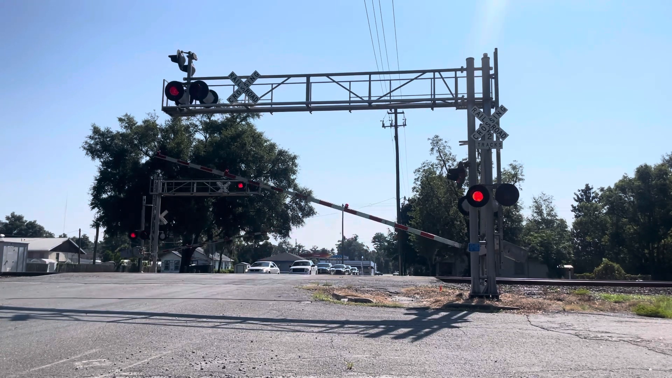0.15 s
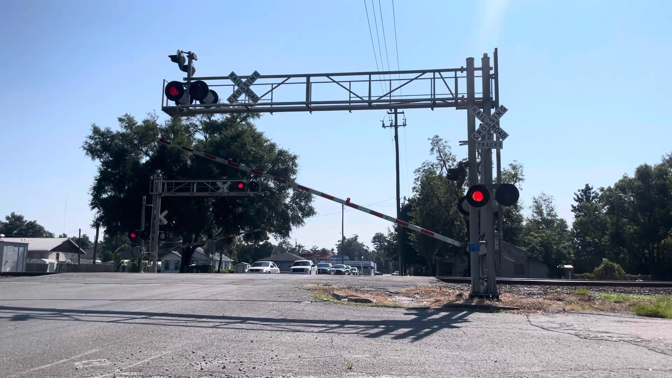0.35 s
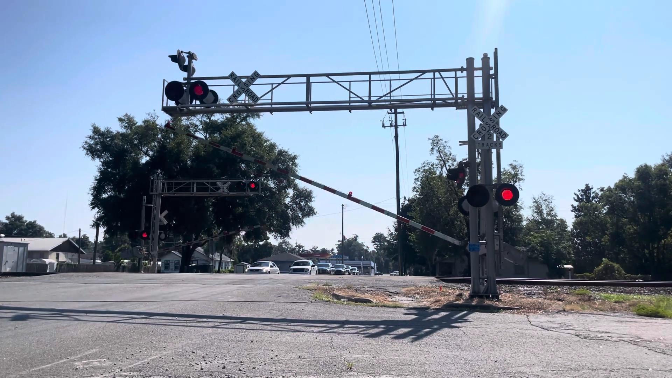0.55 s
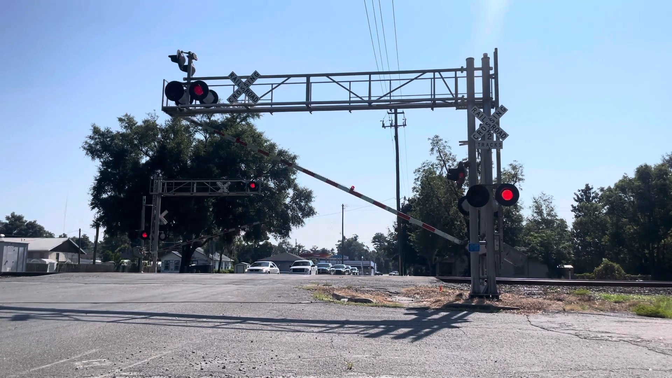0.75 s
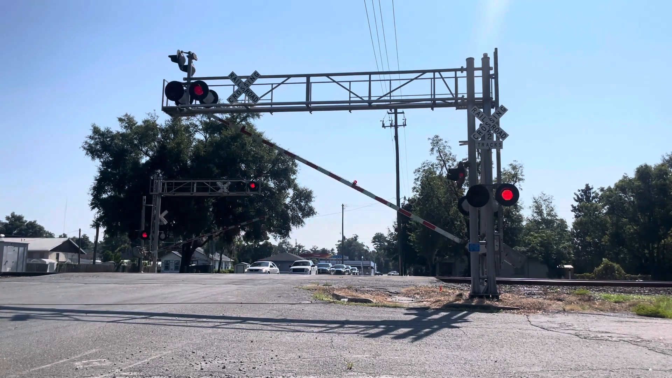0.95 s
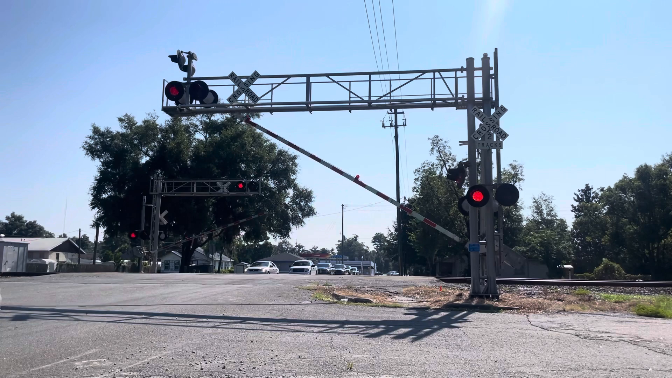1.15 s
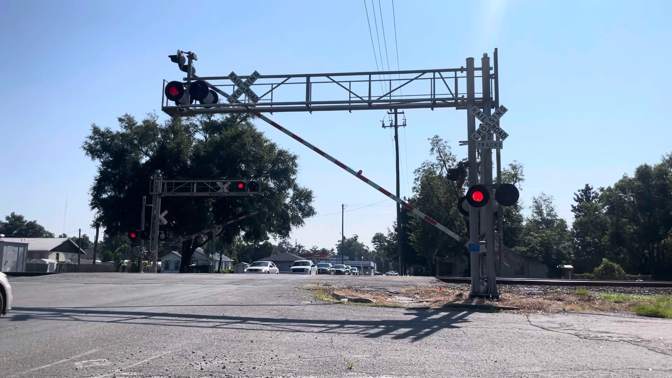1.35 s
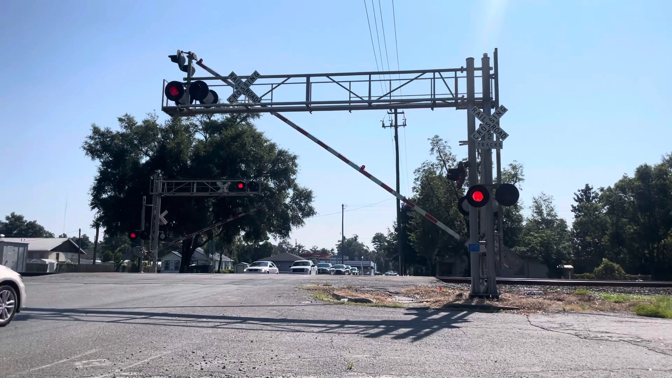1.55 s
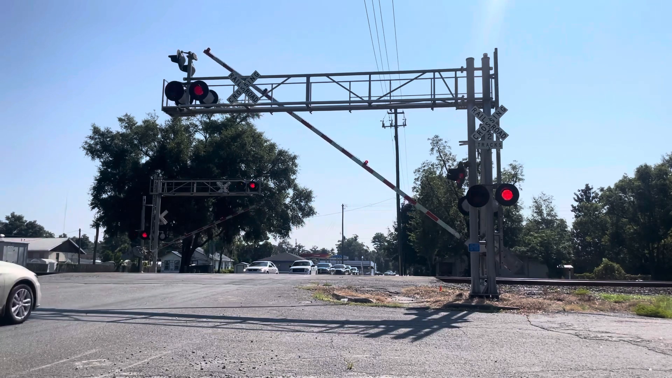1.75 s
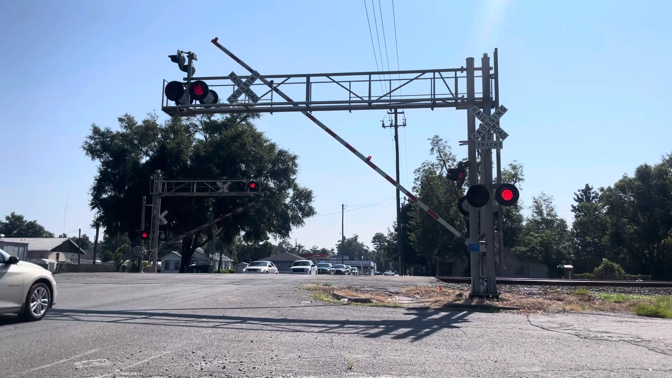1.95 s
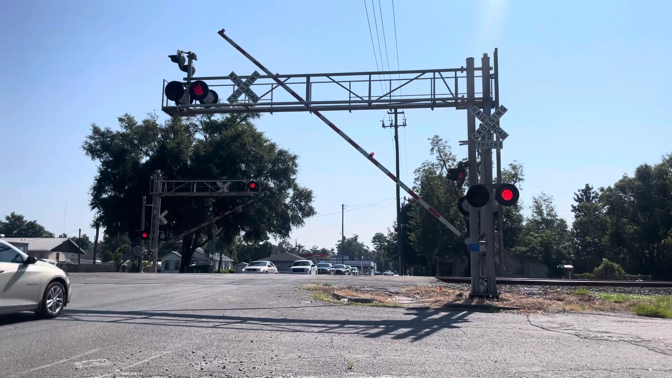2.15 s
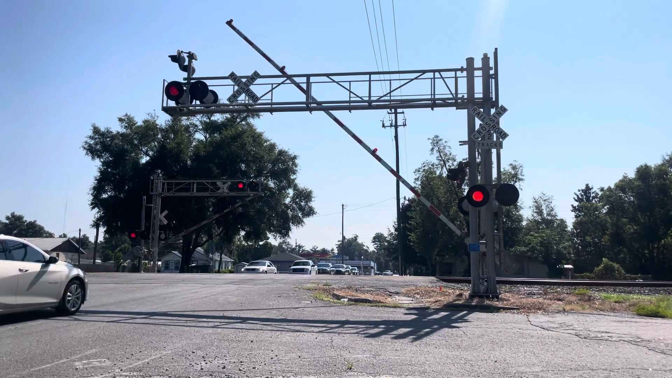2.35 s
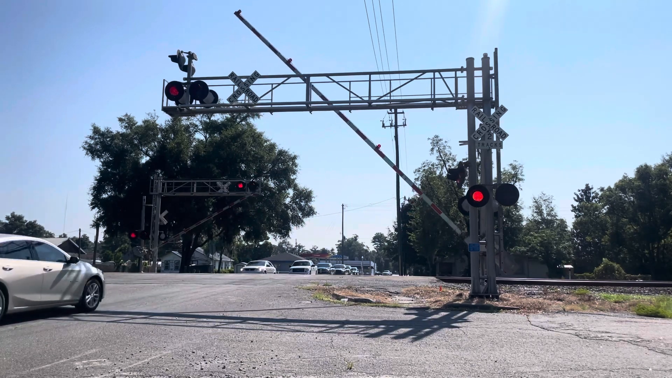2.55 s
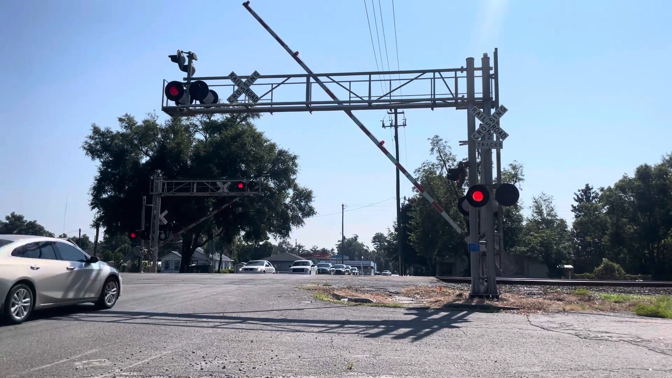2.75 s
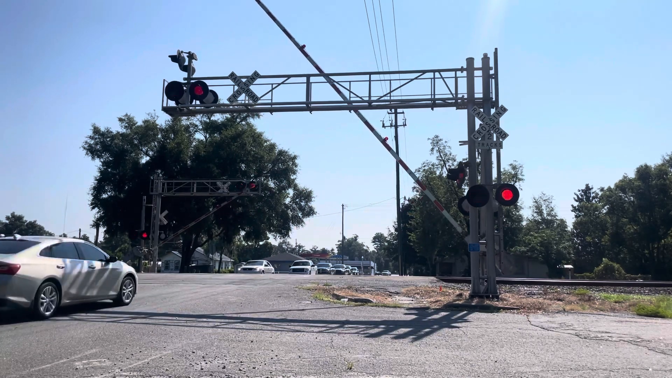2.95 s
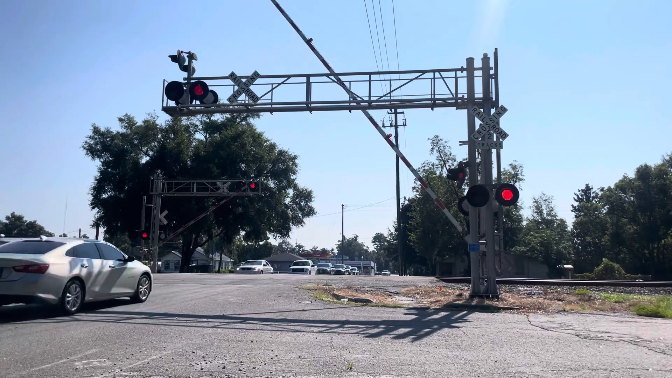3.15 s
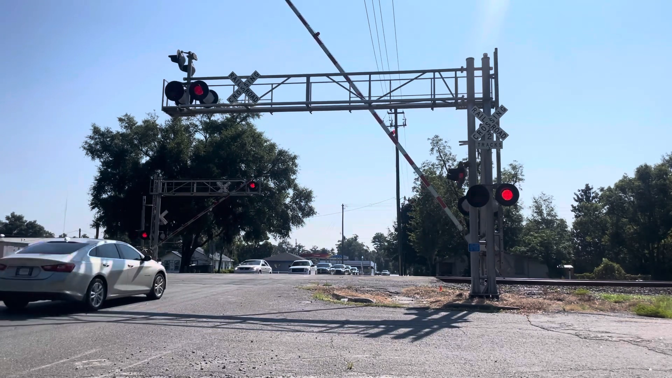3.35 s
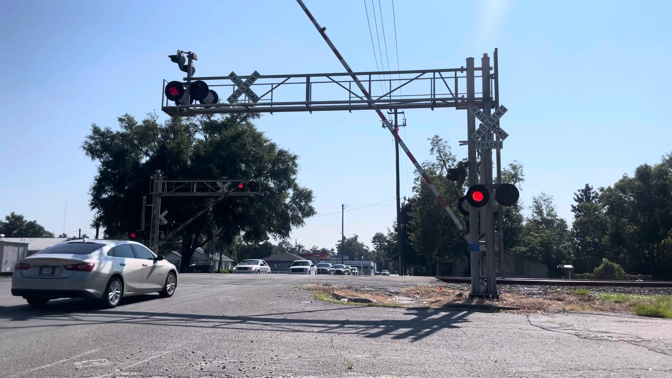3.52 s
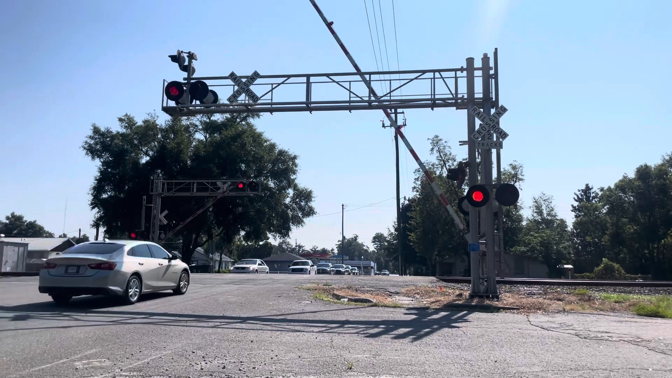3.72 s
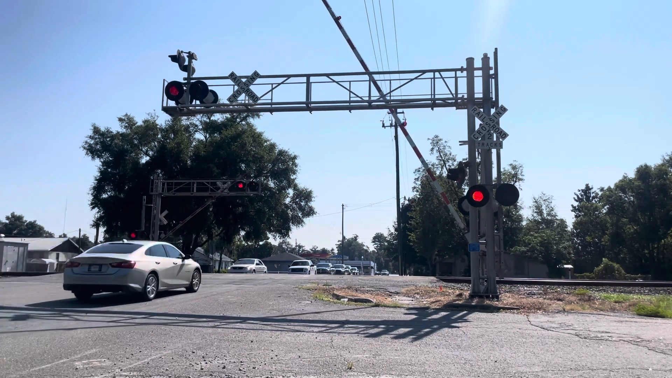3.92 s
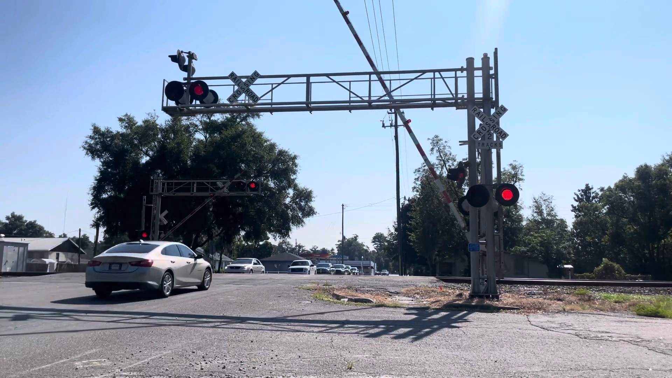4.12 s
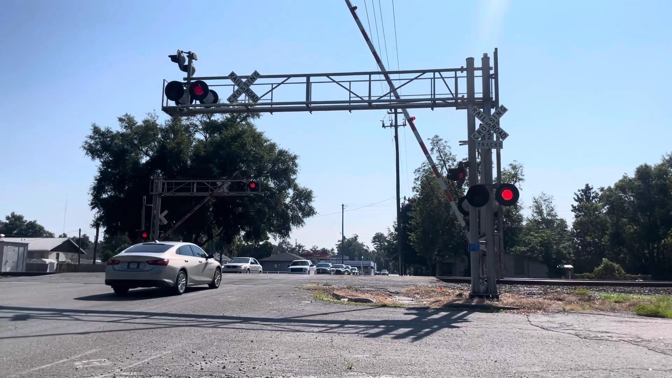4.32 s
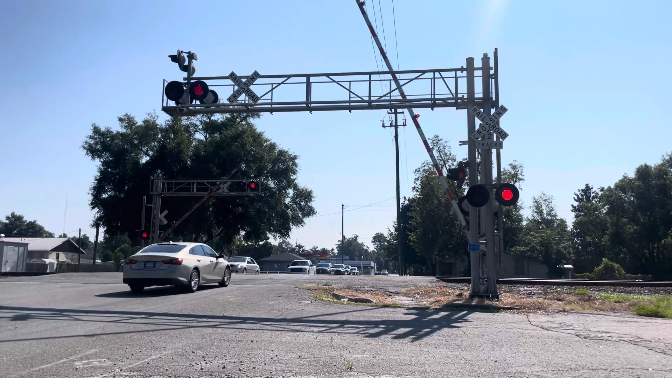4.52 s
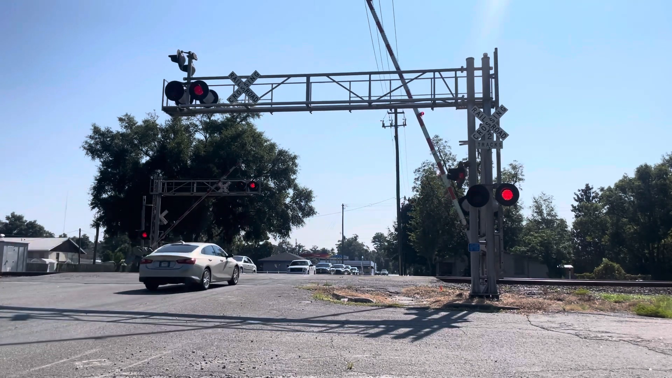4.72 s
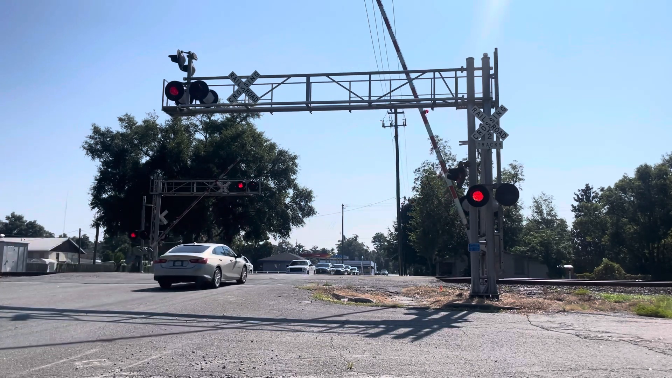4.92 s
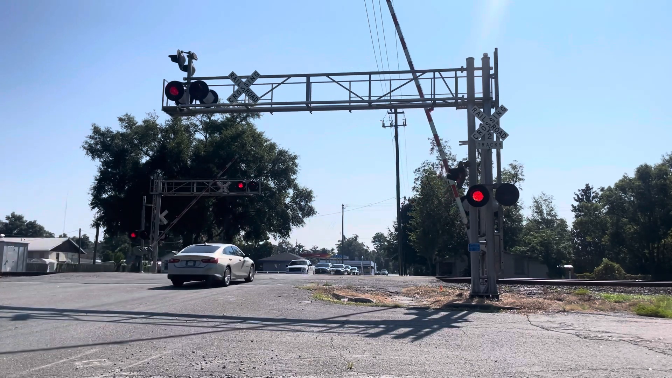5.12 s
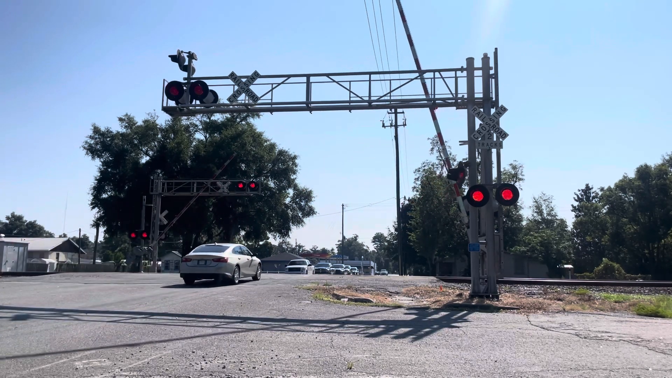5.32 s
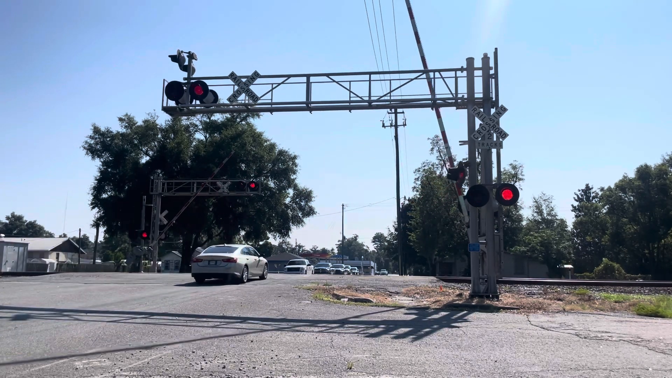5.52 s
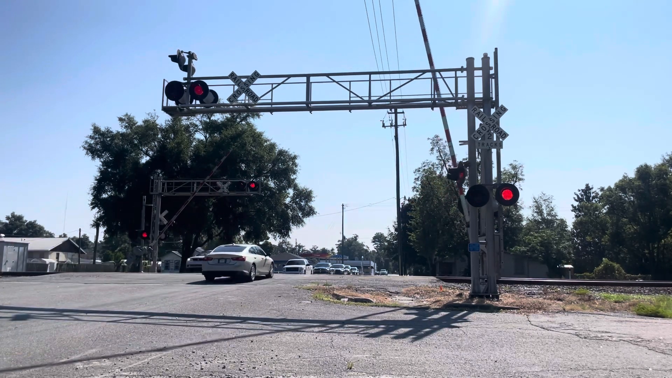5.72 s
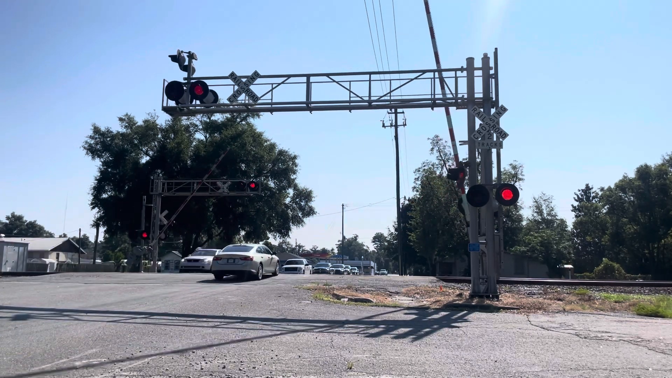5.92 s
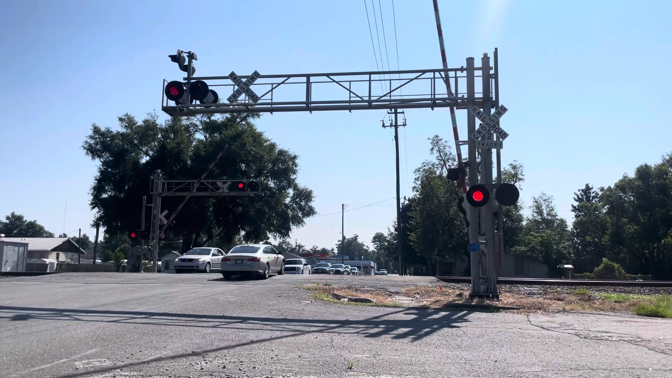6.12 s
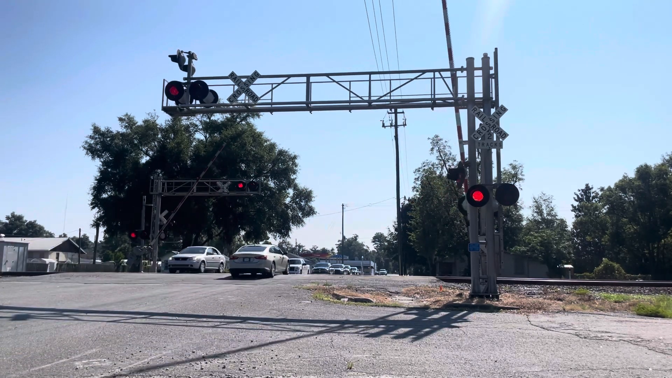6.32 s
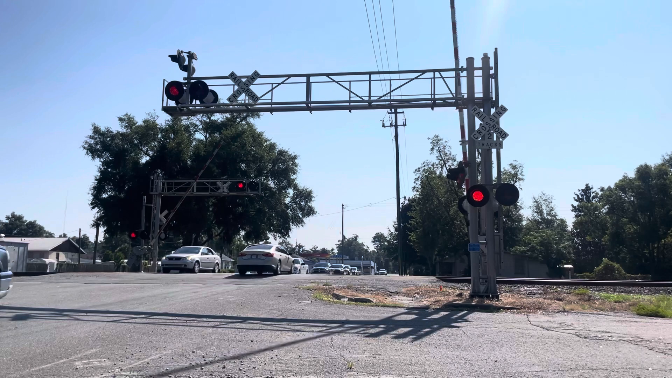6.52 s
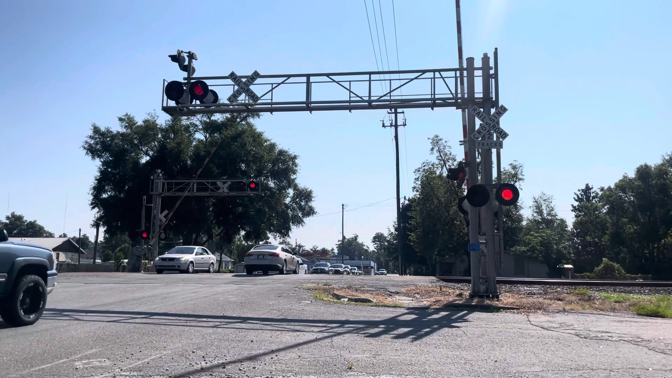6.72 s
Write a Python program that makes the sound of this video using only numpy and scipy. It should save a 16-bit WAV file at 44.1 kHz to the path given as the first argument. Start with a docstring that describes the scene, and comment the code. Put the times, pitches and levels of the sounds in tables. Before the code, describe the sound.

Outdoor road by a rail crossing: soft engine throb, sudden booming acceleration growing nearer, tyre hiss, faint insects and birds, then a quick rattling knock over metal plates.

```python
"""A V8 pickup idles at a level crossing, then pulls away with a booming exhaust, coming up from the left.
Its puffs and engine notes follow one engine-speed curve; its belt squeaks as the engine picks up.
A saloon drives off first: a gliding hum and tyre noise, then knocks that ring the crossing's plates.
Shaped noise makes the distant traffic and the insects; gliding tones make a few far birds.
Road sound reaches the left and right microphones at different times."""
import sys
import numpy as np
from scipy import signal
from scipy.fft import rfft, irfft, next_fast_len
from scipy.io import wavfile
from scipy.ndimage import map_coordinates

SR = 44100
rng = np.random.default_rng(int(sys.argv[2]) if len(sys.argv) > 2 else 0)


def pcm_store(signal):
    """Save signal as 16-bit PCM."""
    levels = np.round(np.clip(np.atleast_2d(signal), -1, 1) * 32767)
    wavfile.write(sys.argv[1], SR, levels.astype(np.int16).T)


N = 302967
T = np.arange(N) / SR  # time in seconds

# Tone-colour tables give relative levels.
# engine speed, idling with a light touch of the pedal, then pulling away: (t/s, firing rate f/Hz)
IDLING_SPEED = [(0, 35.2), (.6, 35.5), (.83, 40), (1.03, 42.5), (1.22, 41.3), (1.35, 39.1), (1.63, 40.4),
                (1.85, 38.6), (2.37, 33), (2.52, 35.5), (2.62, 42)]
PULLING_SPEED = [(2.76, 49.3), (2.87, 62.3), (3.0, 76.2), (3.13, 82.9), (3.3, 83.4), (3.76, 77.2),
                 (4.03, 80.9), (4.35, 80.2), (5.08, 85.9), (5.3, 88.6), (5.58, 88.7), (5.83, 91.7),
                 (6.45, 94.9), (6.87, 92.7)]
# the eight firings of an engine cycle: (delay/firing intervals, relative strength)
CYLINDERS = [(0.016, 0.27), (0.163, 0.79), (0, 1.1), (0.015, 0.87), (0.15, 0.7), (0.012, 0.92),
             (0.13, 0.66), (0.14, 0.44)]
# lines from the two banks' uneven firing: (harmonic of engine cycle, level/dB ahead, level/dB at the side)
LOPE_LINES = [(5, -30.5, -30.5), (7, -35, -30.5), (9, -33.5, -46), (10, -31, -40.5), (11, -32, -43),
              (12, -38.5, -34), (13, -47, -39), (14, -41.5, -35), (15, -41.5, -34.5), (17, -43.5, -44.5),
              (18, -25.5, -28), (19, -48, -35), (20, -33.5, -45), (21, -32, -39.5), (22, -40, -46),
              (24, -33.5, -42.5), (26, -44.5, -49), (29, -42.5, -49), (32, -48.5, -51)]
# upper lines of the idling engine: (harmonic of engine cycle, relative level/dB)
IDLE_LINES = [(24, 1), (32, -0.5), (37, -12.5), (40, -9), (48, -22), (56, -22)]
# colour the exhaust pipe gives the idle throb: (f/Hz, level/dB)
IDLE_PIPE = [(55, -13.5), (70, -1), (83, 3.5), (105, -3.5), (124, 1), (145, 2.5), (175, -0.5), (210, -1.5),
             (250, -8), (330, -9)]
# colour the exhaust pipe gives the puffs: (f/Hz, level/dB)
PUFF_PIPE = [(15, -45), (30, -26), (55, -7), (85, -5.5), (125, -11.5), (165, -15.5), (210, -4), (250, -11),
             (290, -21.5), (340, -24.5), (500, -34), (900, -50), (2000, -77.5)]
# colour of the silencer shell: (f/Hz, level/dB)
GROWL_COLOUR = [(150, -50.5), (270, -10.5), (320, -0.5), (400, 2.5), (470, 3.5), (540, -4), (620, -14),
                (800, -13), (1100, -34), (2000, -57)]
# strength of the silencer's growl: (t/s, level/dB)
GROWL_LEVEL = [(0, -39.5), (2, -54.5), (2.7, -51.5), (3.05, -42), (3.8, -47.5), (4.6, -41), (5.2, -37),
               (5.7, -39), (6.2, -37.5), (6.87, -36.5)]
# passing upper engine lines: (loudest t/s, half-length/s, harmonic of engine cycle, level/dB before the lift)
OVERTONES = [(4.27, .25, 41, -43), (4.95, .15, 43, -43), (5.1, .17, 34, -37), (5.3, .3, 42, -42),
             (5.6, .25, 46, -48), (5.65, .35, 25, -34), (5.85, .5, 26, -36), (6, .25, 35, -43),
             (6.05, .25, 28, -41), (6.25, .25, 32, -42), (6.25, .45, 43, -47), (6.55, .4, 39, -47),
             (6.6, .3, 21, -30), (6.7, .25, 36, -42), (6.85, .25, 24, -36)]
# lift given to the higher upper lines, to offset left-right cancellation: (f/Hz, gain/dB)
OVERTONE_LIFT = [(250, 0), (480, 8)]
# colour of the gas rasp: (f/Hz, level/dB)
RASP_COLOUR = [(200, -14), (350, -0.5), (500, 2), (700, -2.5), (900, -4), (1200, -6.5), (1500, -15.5),
               (2500, -38.5)]
# strength of the gas rasp: (t/s, level/dB)
RASP_LEVEL = [(0, -51), (1, -50), (2.9, -45.5), (5.3, -46.5), (6.87, -40)]
# colour of the intake noise: (f/Hz, level/dB)
INTAKE_COLOUR = [(550, -27), (720, 1.5), (820, 11), (930, -14.5), (1150, -11.5), (1400, -5), (1700, -13.5),
                 (2400, -21.5), (4000, -46)]
# the saloon's engine hum: (t/s, f/Hz, level/dB)
SALOON_HUM = [(0, 45.4, -58.5), (.9, 48.5, -38.5), (1.3, 52.9, -35), (1.75, 55.85, -33.5),
              (2.3, 58.5, -32.5), (2.6, 57.3, -33.5), (3.5, 61.7, -56.5), (6.87, 60.2, -77)]
# colour of tyre noise: (f/Hz, level/dB)
TYRE_COLOUR = [(600, -8), (1100, -9.5), (1700, -2.5), (2400, -3), (3200, -4.5), (4100, -8), (6000, -8),
               (9000, -53)]
# colour of the treble hiss: (f/Hz, level/dB)
HISS_COLOUR = [(3400, -13), (4400, -1.5), (5500, -2.5), (6400, 4), (6900, 3), (7600, -7), (8600, -12.5),
               (10300, -4.5), (12000, -11), (15500, -27)]
# strength of the treble hiss: (t/s, level/dB)
HISS_LEVEL = [(0, -56.5), (1.9, -58), (2.5, -58), (4.1, -60), (5.4, -55), (6.87, -56)]
# bands of the far insects: (centre f/Hz, width/Hz, relative level/dB)
CHORUS_BANDS = [(4400, 400, -61), (5100, 250, -62), (6750, 170, -67)]
# strength of the far insects: (t/s, level/dB)
CHORUS_LEVEL = [(0, -67), (1.6, -60), (2, -65.5), (6.87, -72.5)]
# middles of the near insect's bursts: (t/s)
CHIRP_TIMES = [0.685, 1.567, 2.548]
# colour of the near insect's wings: (f/Hz, level/dB)
WING_COLOUR = [(3500, -24.5), (5000, -14.5), (6500, -24), (8500, -21.5), (9400, -2.5), (10000, -3.5),
               (10500, -13), (13000, -32), (14300, -12), (15500, -25)]
# bird calls: (start t/s, length/s, first f/Hz, last f/Hz, level/dB, random pitch flutter/Hz)
BIRD_CALLS = [(.6, 0.12, 2750, 2600, -55, 447), (0.921, 0.09, 2870, 2600, -53, 450),
              (4.088, 0.18, 4100, 2500, -57, 110), (5.11, .07, 3650, 3100, -60, 55),
              (5.208, 0.1, 3600, 3120, -61, 55)]
# alternator whine: (t/s, level/dB)
WHINE_LEVEL = [(0, -83), (2.8, -66), (3.2, -47), (3.7, -62), (4.2, -43.5), (4.7, -49), (5.2, -62.5),
               (6.87, -60)]
# belt squeal: (t/s, f/Hz, level/dB, random pitch flutter/Hz)
BELT_SQUEAL = [(2.44, 6420, -75, 40.4), (2.465, 6050, -52, 50), (2.49, 6100, -50, 50.3),
               (2.505, 6300, -54, 70.3), (2.575, 6270, -52, 90), (2.61, 6420, -51, 230),
               (2.66, 6580, -52, 376), (2.73, 6500, -62, 398)]
# short belt slips: (middle t/s, f/Hz, level/dB)
BELT_SLIPS = [(2.66, 6560, -46.5), (2.704, 6440, -44), (2.765, 5840, -50), (2.82, 6160, -42),
              (2.944, 5930, -46), (3.149, 6160, -50), (3.339, 5730, -48), (3.84, 6050, -51),
              (3.949, 5870, -45), (4.05, 5620, -47), (4.15, 5760, -51), (4.45, 6400, -47)]
# wheels knocking over the crossing: (t/s, level/dB, time to fall 60 dB/s, brightness/dB per octave)
KNOCKS = [(6.383, -37, 0.24, 0.5), (6.41, -48.5, .18, 1), (6.473, -34.5, 0.22, -2.5),
          (6.486, -35.5, 0.44, 1.5), (6.499, -32, 0.22, -5), (6.512, -38, 0.28, 4), (6.535, -33, 0.3, -8.5),
          (6.548, -40, 0.18, -1), (6.569, -37, 0.3, -1.5), (6.622, -41, 0.21, -3.5),
          (6.648, -42.5, 0.18, -1)]
# ringing notes of the plates: (f/Hz, relative level/dB, time to fall 60 dB/s)
PLATE_MODES = [(737, 7, .15), (905, -4.5, .26), (937, -3, .2), (989, -6.5, .3), (1074, -10.5, .26),
               (1254, -9, .28), (1330, -12, .26), (1464, -12, .26), (1572, -15, .3), (1620, -15, .26),
               (1733, -14.5, .3), (2130, -12.5, .18), (2234, -10.5, .2), (2449, -17.5, .25),
               (2665, -13.5, .19), (3138, -15.5, .25), (3747, -18, .21), (5800, -22, .15)]
# colour of the gritty knocks: (f/Hz, level/dB)
CRUNCH_COLOUR = [(400, -21), (700, -5.5), (950, -2), (1400, -7), (2200, -11), (3200, -16.5), (4500, -21),
                 (6600, -18), (8300, -41.5), (10300, -20), (12500, -43.5), (15000, -38.5)]
# how far the left microphone leads for road sound: (f/Hz, phase/radians)
LEFT_LEAD = [(50, 0.06), (90, 0.39), (180, 1.14), (290, 1.26), (480, 2.5), (950, 2.5), (1300, 3.5),
             (2200, 5), (3000, 7.5), (7000, 4.5), (9600, 4), (14400, 4)]
# how alike the two microphones' noise is: (f/Hz, likeness 0-1)
LIKENESS = [(200, 0.88), (500, 0.52), (1200, 0.64), (3000, 0.54), (6500, 0.27), (12000, 0.16)]
# left level minus right level for road sound: (f/Hz, level/dB)
LEFT_TILT = [(60, -0.5), (180, 2), (350, 4), (1000, 2.5), (2500, 0.3), (6000, -4), (9000, 0.5)]

# truck movement: it starts behind and to the left, and gathers speed evenly
ROLL_S, TRUCK_M_PER_S2, BEHIND_M, LANE_M = 2.45, 1.57, 13.83, 5.4
PEDAL_S, PEDAL_RISE_S = 2.45, 0.23  # the throttle opens
# firing rates: at rest, where load begins, and the span over which it becomes full
IDLE_HZ, LOAD_FROM_HZ, LOAD_SPAN_HZ = 34.9, 47.2, 30.6

# exhaust: levels are at the starting distance
BOOM_DB, OCTAVE_DB = -16, -16  # firing note and its octave under full load
BOOM_SHADE_DB, OCTAVE_SHADE_DB = 0.5, 8  # lost alongside, where the truck's body hides the pipe
LUNGE_S, LUNGE_SPAN_S = 2.95, 0.32  # the truck first strains forward
LUNGE_DB, LUNGE_OCTAVE_DB = 2.5, -3.5  # change this makes to firing note and octave
ROUGH_DB = 0.03  # unsteadiness under load
SURGE_DB, SURGE_HZ, SURGE_WIDTH_HZ = -23.5, 101, 25  # the pipe's lowest resonance
IDLE_DB, IDLE_DB_PER_HZ, PEDAL_DB = -33.5, 0.39, 8  # idle throb; rise with speed; rise with the throttle
BURBLE_IDLE_DB, BURBLE_LOAD_DB, BURBLE_FLARE_DB = -34.5, -45.5, 6.5  # puffs; rise with the throttle
SCATTER_IDLE, SCATTER_LOAD = 0.61, 0.13  # unevenness of firing
THROB_LAG = .03  # each harmonic's throb comes this share of an engine cycle after the one below
TURN_FROM, TURN_SPAN = 0.44, .2  # how far alongside (0-1) the lope changes colour, and over how much
BLUR_RAD, BLUR_HZ = .6, 30  # overtone blur: phase swing, and random points per second
OVERTONE_PULSE = 0.63  # depth of overtone pulsing, once per engine cycle
INTAKE_DB, INTAKE_BEAM_DB = -41, 40  # level alongside; how much it weakens towards straight ahead

# tyres: levels of the saloon at its loudest and of far traffic, then the road reflection's treble dip
SALOON_PASS_S, SALOON_PASS_WIDTH_S = 4.16, 2.16
TYRE_DB, FAR_TYRE_DB = -50, -56
DIP_S, DIP_HZ, DIP_RISE_HZ_PER_S2 = 3.57, 4310, 310  # when lowest, its pitch then, and how fast it climbs
DIP_STRENGTH, DIP_SPAN_S = 0.47, 2.36
# stones pinging under the saloon's tyres: middle pitch, fade time, level of the largest at the peak
GRIT_PER_S, GRIT_HZ, GRIT_RING_S, GRIT_DB = 55, 2600, 0.008, -42.48
GRIT_S, GRIT_SPAN_S = 5.0, .9  # the gritty stretch of road

CHIRP_DB, CHIRP_HALF_S, TOOTH_HZ = -44, 0.081, 472  # near insect; tooth clicks per second
TRILL_FROM_S, TRILL_RISE_S = 4.3, 0.97  # one more insect joins in
TRILL_HZ, TRILL_PULSE_HZ, TRILL_DB = 6890, 24.5, -57.5
BRIGHT_PIVOT_HZ = 1500  # brighter knocks have more above this, duller ones more below
TOP_HZ = 15800  # highest pitch kept


def amp(db):
    """Turn decibels into gain."""
    return 10 ** (np.asarray(db) / 20)


def unit(x):
    """Scale to an rms (average strength) of 1."""
    return x / np.sqrt(np.mean(x ** 2) + 1e-20)


def ramp(x):
    """Hold between 0 and 1."""
    return np.clip(x, 0, 1)


def along(points, hz):
    """Read a (f/Hz, value) table between its points, on a log pitch axis."""
    f, v = np.transpose(points)
    return np.interp(np.log(hz + 1), np.log(f + 1), v)


def curves(rows):
    """Draw one curve over time for each column after the time."""
    s, *cols = np.transpose(rows)
    return [np.interp(T, s, c) for c in cols]


def wobble(rate):
    """A smooth random curve through the given number of random points per second."""
    return map_coordinates(rng.standard_normal(int(N * rate / SR) + 4), [T * rate])


def tone(hz):
    """A sine wave that follows a pitch curve."""
    return np.sin(2 * np.pi * np.cumsum(hz) / SR)


def filtered(x, response):
    """Multiply each frequency of x by the response there; padding keeps the end off the start."""
    m = next_fast_len(N + SR // 2)
    return irfft(rfft(x, m) * response(np.fft.rfftfreq(m, 1 / SR)), m)[..., :N]


def noise(spectrum):
    """Coloured noise of rms 1."""
    return unit(filtered(rng.standard_normal(N), lambda hz: amp(along(spectrum, hz))))


def diffuse(spectrum):
    """Stereo noise whose two sides share a part and differ in the rest."""
    turn = lambda hz: np.arccos(np.clip(along(LIKENESS, hz), -1, 1)) / 2
    pair = np.array([noise(spectrum), noise(spectrum)])
    shared, different = filtered(pair, lambda hz: np.array([np.cos(turn(hz)), np.sin(turn(hz))]))
    return np.array([shared + different, shared - different])


def from_road(x):
    """Sound from the left leads at the left microphone; the level difference varies with pitch."""
    half = np.array([[.5], [-.5]])
    return filtered(x, lambda hz: amp(half * along(LEFT_TILT, hz)) * np.exp(1j * half * along(LEFT_LEAD, hz)))


def rush(spectrum):
    """Noise from the road, rms 1 when both sides are averaged."""
    pair = from_road(diffuse(spectrum))
    return pair / np.std(pair.mean(axis=0))


def approach():
    """Even acceleration gives the truck's gain in dB over the start, and how far it is alongside (0-1)."""
    travelled = .5 * TRUCK_M_PER_S2 * np.maximum(T - ROLL_S, 0) ** 2
    distance = np.hypot(LANE_M, BEHIND_M - travelled)
    return 20 * np.log10(distance[0] / distance), LANE_M / distance


def puffs(firings, body, scatter):
    """One uneven pressure puff per firing, patterned by cylinder, rings through a body."""
    number = np.arange(int(firings[-1]))
    delay, strength = np.array(CYLINDERS)[number % len(CYLINDERS)].T
    chance = rng.standard_normal((len(number), 2))
    scatter = np.interp(number, firings, scatter * np.ones(N))
    moment = number + delay + 0.075 * scatter * chance[:, 0]
    when = np.interp(moment, firings, np.arange(N)).astype(int)
    train = np.bincount(when, -strength * (1 + scatter * chance[:, 1]), N)
    # fold the log spectrum's echo onto positive time, so the ring starts at once (minimum phase)
    cepstrum = irfft(np.log(amp(along(body, np.fft.rfftfreq(SR, 1 / SR)))))
    fold = 2 * (np.arange(SR) < SR // 2) - (np.arange(SR) == 0)
    ring = irfft(np.exp(rfft(cepstrum * fold)))
    return unit(signal.fftconvolve(train, ring[:SR // 2])[:N])


def idle_lines(firings):
    """Harmonics of the eight-firing engine cycle, each wavering in level."""
    cycles = firings / len(CYLINDERS)
    total = 0
    for harmonic, db in IDLE_LINES:
        phase = round(harmonic) * cycles + rng.uniform()
        total = total + amp(db + 1.6 * wobble(3)) * np.cos(2 * np.pi * phase)
    return total


def lope(firings, alongside):
    """The two banks swell the octave once per engine cycle; the pipe lets each throb's low part out first."""
    cycles, octave = firings / len(CYLINDERS), 2 * len(CYLINDERS)
    turn = ramp((alongside - TURN_FROM) / TURN_SPAN)
    total = 0
    for harmonic, ahead_db, side_db in LOPE_LINES:
        k = round(harmonic)
        lag = THROB_LAG * (k - octave) ** 2 / 2
        phase = k * cycles - lag + 0.11 * rng.normal()
        level = amp(ahead_db + (side_db - ahead_db) * turn + wobble(2.975))
        total = total - level * np.cos(2 * np.pi * phase)
    return total


def exhaust(rate, firings, load):
    """A soft throb at idle; under load the firing note and its octave boom, with the banks' lope around them."""
    near_db, alongside = approach()
    shade = alongside ** 4
    pedal = ramp((T - PEDAL_S) / PEDAL_RISE_S)
    note = -np.cos(2 * np.pi * firings)
    octave = -np.cos(4 * np.pi * firings + np.pi / 10)

    lunge = np.exp(-((T - LUNGE_S) / LUNGE_SPAN_S) ** 2)
    boom = amp(BOOM_DB + LUNGE_DB * lunge - BOOM_SHADE_DB * shade) * note
    boom = boom + amp(OCTAVE_DB + LUNGE_OCTAVE_DB * lunge - OCTAVE_SHADE_DB * shade) * octave
    loaded = load * amp(ROUGH_DB * wobble(3.8)) * (boom + lope(firings, alongside))

    # as the throttle opens, the octave sweeps through the pipe's lowest resonance
    resonance = np.exp(-((2 * rate - SURGE_HZ) / SURGE_WIDTH_HZ) ** 2)
    surge = amp(SURGE_DB) * pedal * resonance * octave

    speed_up_hz = np.minimum(rate, LOAD_FROM_HZ) - IDLE_HZ
    idle_db = IDLE_DB + IDLE_DB_PER_HZ * speed_up_hz * (1 - pedal) + PEDAL_DB * pedal
    idle = amp(-0.5 + 1.5 * wobble(12.0)) * octave + idle_lines(firings)
    idle = filtered((1 - load) * amp(idle_db) * idle, lambda hz: amp(along(IDLE_PIPE, hz)))

    light_db = BURBLE_IDLE_DB + BURBLE_FLARE_DB * pedal
    burble_db = light_db * (1 - load ** 2) + BURBLE_LOAD_DB * load ** 2
    scatter = SCATTER_IDLE + (SCATTER_LOAD - SCATTER_IDLE) * load
    burble = amp(burble_db) * puffs(firings, PUFF_PIPE, scatter)
    return from_road(amp(near_db) * (loaded + surge + idle + burble))


def overtones(firings):
    """Upper engine lines swell and fade in turn, blurred by uneven firing and lifted towards the treble."""
    cycles = firings / len(CYLINDERS)
    swells = 0
    for s, span, harmonic, db in OVERTONES:
        swell = amp(db + 1.5 * wobble(10)) * np.exp(-((T - s) / span) ** 2)
        phase = 2 * np.pi * (harmonic * cycles + rng.uniform()) + BLUR_RAD * wobble(BLUR_HZ)
        swells = swells + swell * np.cos(phase)
    pulse = 1 + OVERTONE_PULSE * np.cos(2 * np.pi * cycles)
    return filtered(swells * pulse, lambda hz: amp(along(OVERTONE_LIFT, hz)))


def silencer(firings):
    """Each firing's puff makes the silencer shell growl, with upper engine lines on top."""
    growl = amp(curves(GROWL_LEVEL)[0]) * puffs(firings, GROWL_COLOUR, scatter=0.5)
    return from_road(growl + overtones(firings))


def gas_noise(firings):
    """Gas rasps with each firing; the intake's noise is heard as the truck draws level."""
    alongside = approach()[1]
    # pulse once per firing and once per engine cycle
    pulse = unit(1 + 0.1 * np.cos(2 * np.pi * firings) + 0.11 * np.cos(np.pi * firings / 4))
    rasp = amp(curves(RASP_LEVEL)[0] + 1.2 * wobble(9.7)) * rush(RASP_COLOUR)
    intake_db = INTAKE_DB - INTAKE_BEAM_DB * (1 - alongside)
    intake = amp(intake_db + 3.1 * wobble(26)) * rush(INTAKE_COLOUR)
    return pulse * (rasp + intake)


def saloon_engine():
    """The saloon hums as it drives away: one tone of gliding pitch and level."""
    hz, db = curves(SALOON_HUM)
    return from_road(amp(db + 1.3 * wobble(2.1)) * tone(hz))


def far_traffic():
    """Far roads rumble as low noise."""
    return amp(-31.5) * rush([(15, -31.0), (45, -7.5), (150, -4.0), (300, -18), (1000, -39.0), (3000, -83.5)])


def off_asphalt(x):
    """The road surface returns a slightly later copy, which cuts a moving dip into the treble."""
    since = T - DIP_S
    dip_hz = DIP_HZ + DIP_RISE_HZ_PER_S2 * since ** 2
    strength = DIP_STRENGTH * np.exp(-(since / DIP_SPAN_S) ** 4)
    late = np.arange(N) - SR / (2 * dip_hz)  # half a wave late cancels at the dip
    copy = np.array([map_coordinates(side, [late]) for side in x])
    return (x + strength * copy) / np.sqrt(1 + strength ** 2)


def tyres():
    """The saloon's rolling noise swells and fades over that of far traffic and a high hiss."""
    passing = amp(TYRE_DB) * np.exp(-((T - SALOON_PASS_S) / SALOON_PASS_WIDTH_S) ** 2)
    level = np.hypot(passing, amp(FAR_TYRE_DB))
    roll = level * amp(0.85 * wobble(14)) * rush(TYRE_COLOUR)
    hiss = amp(curves(HISS_LEVEL)[0]) * rush(HISS_COLOUR)
    return off_asphalt(roll + hiss)


def far_chorus():
    """Many far insects shrill together as noise in a few high bands."""
    def shrill(f):
        return sum(amp(db) / np.sqrt(w) / (1 + ((f - hz) / w * 2) ** 2) for hz, w, db in CHORUS_BANDS)
    chorus = unit(filtered(rng.standard_normal((2, N)), shrill))
    return amp(curves(CHORUS_LEVEL)[0]) * chorus


def near_insect():
    """One insect rasps its wings in swelling bursts of fast tooth clicks."""
    swell = sum(np.exp(-np.abs((T - s) / CHIRP_HALF_S) ** 1.4) for s in CHIRP_TIMES)
    teeth = unit(amp(4 * np.cos(2 * np.pi * TOOTH_HZ * T + 1.5 * wobble(150))))
    return amp(CHIRP_DB) * from_road(swell * teeth * noise(WING_COLOUR))


def birds():
    """Far birds give hoarse calls and faint falling whistles: gliding tones with a fluttering pitch."""
    song = np.zeros(N)
    for s, length, first_hz, last_hz, db, flutter_hz in BIRD_CALLS:
        u = ramp((T - s) / length)  # progress through the call
        hz = first_hz * (last_hz / first_hz) ** u + flutter_hz * wobble(900)
        song += amp(db) * np.sqrt(4 * u * (1 - u)) * tone(hz)
    return song


def belt(firings):
    """The alternator whines with engine speed; its belt squeals, then slips in short scratchy squeaks."""
    whine_cycles = 15.45 * firings
    whine_level = amp(curves(WHINE_LEVEL)[0] + 1.8 * wobble(23))
    whine = whine_level * np.sin(2 * np.pi * whine_cycles + .5 * wobble(30))
    hz, db, flutter_hz = curves(BELT_SQUEAL)
    squeal = amp(db + 2.5 * wobble(92)) * tone(hz + flutter_hz * wobble(1100))
    for s, pitch_hz, level_db in BELT_SLIPS:
        t = T[:SR // 25] - .02  # seconds from the slip's middle
        glide_hz = pitch_hz + 330 * wobble(1600)[:len(t)]
        slip = amp(level_db) * np.exp(-(t / 0.0085) ** 2) * tone(glide_hz)
        squeal[round((s + t[0]) * SR):][:len(t)] += slip
    # fainter slips, one for each turn of the crank, while the belt is strained
    strain = np.exp(-((T - 3.6) / 1.1) ** 4)
    turns = np.cos(np.pi * firings / 4) ** 16
    scratch = noise([(4500, -31.0), (5400, -5.0), (6400, -2.5), (7300, -29.5)])
    squeal += strain * turns * amp(-54.0 + 1.2 * wobble(26)) * scratch
    return from_road(whine + squeal)


def grit():
    """Stones flick out of the tread, each with its own short fading ping."""
    count = int(GRIT_PER_S * N / SR)
    when, pitch, smallness = rng.random((count, 3)).T[:, :, None]
    t = T[:SR // 25]
    hz = GRIT_HZ * 2 ** (.7 * (pitch - .5))
    fade = np.exp(-t / GRIT_RING_S) * (1 - np.exp(-t / .001))
    pings = amp(-12 * smallness) * fade * np.sin(2 * np.pi * hz * t)
    index = (when * N).astype(int) + np.arange(len(t))
    spray = np.bincount(index.ravel(), pings.ravel(), N)[:N]
    stretch = np.exp(-((T - GRIT_S) / GRIT_SPAN_S) ** 2)
    return from_road(amp(GRIT_DB) * stretch * spray)


def trill():
    """A thin insect trill: noise in one narrow high band, gently pulsing."""
    pulse = 1 + 0.16 * np.sin(2 * np.pi * TRILL_PULSE_HZ * T + wobble(9))
    band = unit(filtered(rng.standard_normal(N), lambda hz: 1 / (1 + ((hz - TRILL_HZ) / 170) ** 2)))
    return amp(TRILL_DB) * ramp((T - TRILL_FROM_S) / TRILL_RISE_S) * pulse * band


def clatter():
    """Straight ahead, a quick run of gritty knocks sets the crossing's plates ringing at their own notes."""
    scrape, power = np.zeros((2, N)), np.zeros((len(PLATE_MODES), N))
    hz, level, life = np.array(PLATE_MODES).T[:, :, None]
    crunch = amp(1.5 * wobble(500)) * diffuse(CRUNCH_COLOUR)
    size = SR // 2
    burst_hz = np.fft.rfftfreq(size, 1 / SR)
    for i, (s, db, t60, bright_db) in enumerate(KNOCKS):
        start = round(s * SR)
        t = T[:min(size, N - start)]
        attack = 1 - np.exp(-t / 0.0013)
        tilt = lambda f: bright_db * np.log2(np.clip(f, 500, 6000) / BRIGHT_PIVOT_HZ)
        piece = crunch[:, i * size:][:, :size]  # each knock has its own piece of noise
        burst = irfft(rfft(piece) * amp(tilt(burst_hz)), size)
        scrape[:, start:][:, :len(t)] += attack * amp(db - 60 * t / t60) * burst[:, :len(t)]
        power[:, start:][:, :len(t)] += (attack * amp(db + tilt(hz) + level - 60 * t / life)) ** 2
    # the plates rattle in their seats, which roughens each note
    ring = 0
    for p, f in zip(power, hz):
        ring = ring + np.sqrt(p) * np.sin(2 * np.pi * (f * T + rng.uniform()) + .2 * wobble(60))
    return amp(-0.5) * scrape + amp(-1.5) * ring


def scene():
    """The truck's engine speed drives its exhaust, silencer, gas noise and belt; the other sounds join it."""
    rate, = curves([*IDLING_SPEED, *PULLING_SPEED])
    firings = np.cumsum(rate) / SR  # firings so far
    load = ramp((rate - LOAD_FROM_HZ) / LOAD_SPAN_HZ)
    truck = exhaust(rate, firings, load) + silencer(firings) + gas_noise(firings) + belt(firings)
    road = saloon_engine() + far_traffic() + tyres() + grit() + clatter()
    nature = far_chorus() + near_insect() + birds() + trill()
    return truck + road + nature


def record(dry):
    """The microphones keep nothing above their band limit."""
    return filtered(dry, lambda hz: hz < TOP_HZ)


dry = scene()
out = record(dry)
pcm_store(out)
```